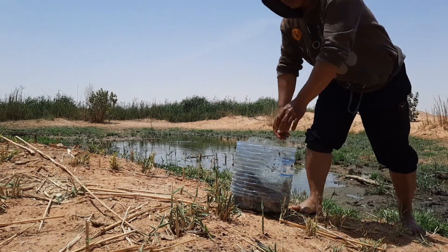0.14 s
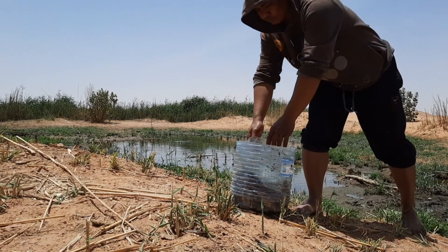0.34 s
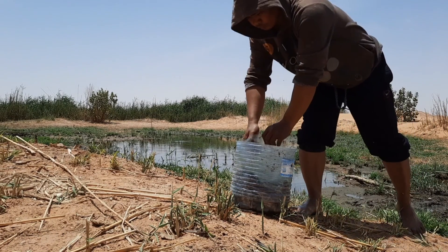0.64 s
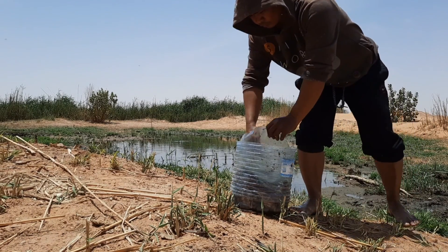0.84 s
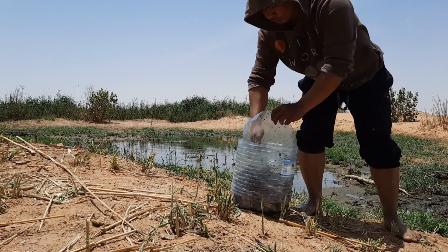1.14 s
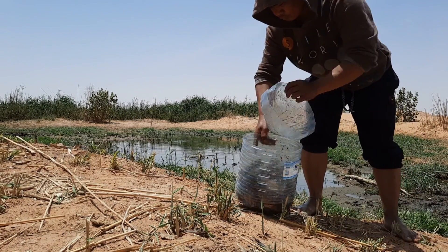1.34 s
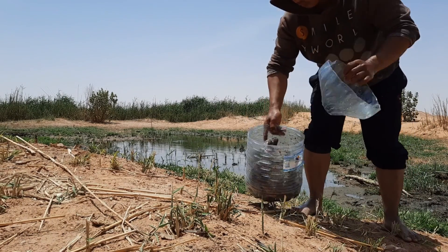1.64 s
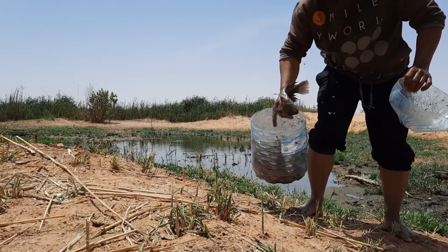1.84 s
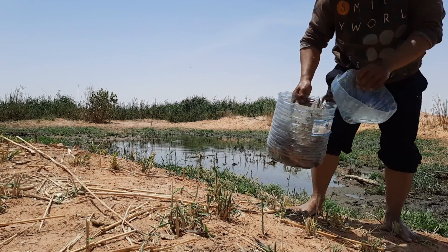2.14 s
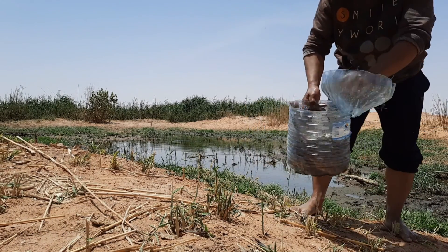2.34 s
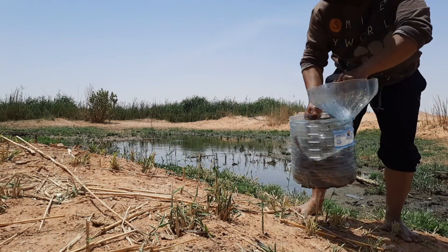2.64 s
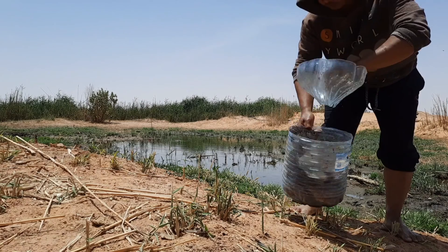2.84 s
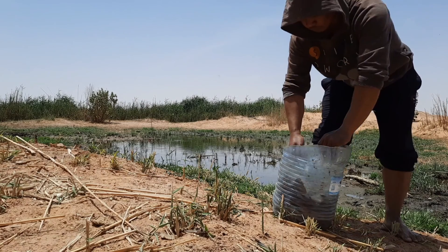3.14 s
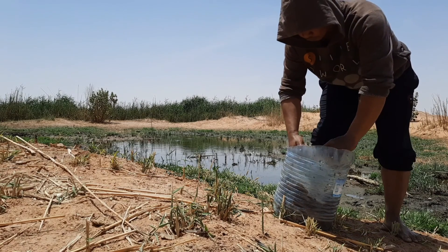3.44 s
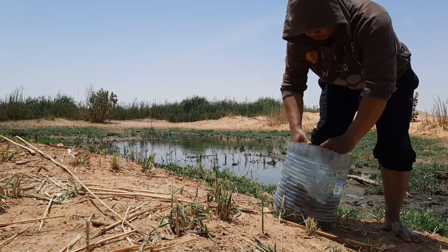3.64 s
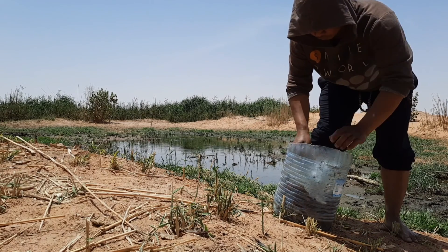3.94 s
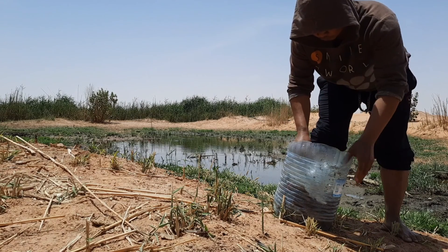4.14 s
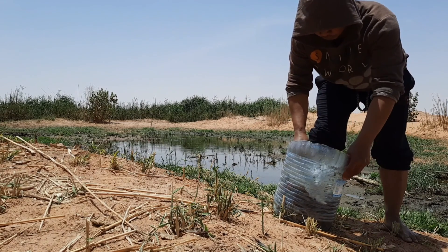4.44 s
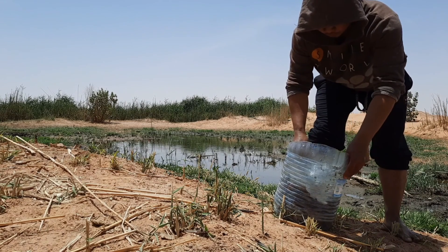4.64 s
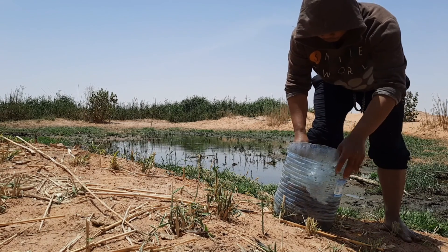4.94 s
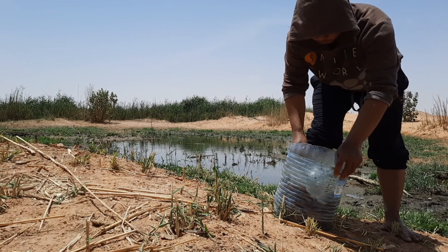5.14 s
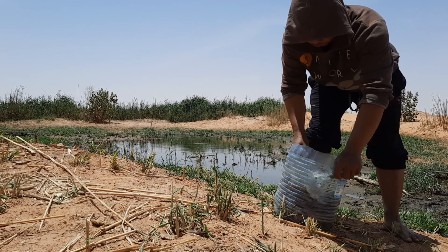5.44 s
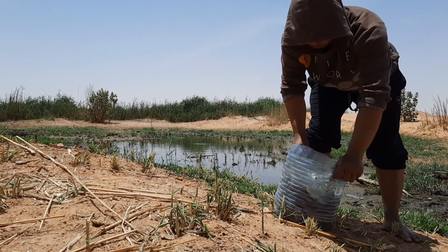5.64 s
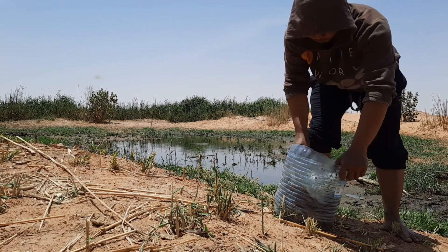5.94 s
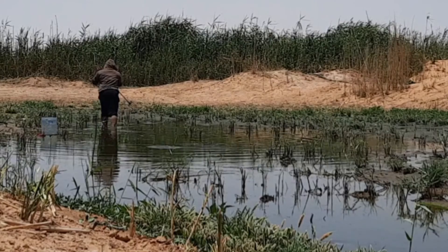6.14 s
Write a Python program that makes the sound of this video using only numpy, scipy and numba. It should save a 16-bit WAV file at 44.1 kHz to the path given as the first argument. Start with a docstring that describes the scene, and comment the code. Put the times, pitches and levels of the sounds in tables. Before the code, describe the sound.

A big thin plastic bottle crackles and creaks as its cut top is pulled out, turned over and pressed back in, with hollow knocks.

```python
"""Outdoors, a hand pulls the cut-off top out of a big thin plastic bottle, turns it over and presses it back in.
Stick-slip friction sounds in dense grains, coloured by how the top is held; creases snap through in ticks and
clacks, and struck body modes give a hollow ring. Thin squeaks and low thuds are gliding or dying sine tones.
Two close microphone ports hear the bottle from the right, over filtered noise: the low rumble of open air."""
import sys
import numpy as np
from scipy import signal
from scipy.fft import rfft, irfft
from scipy.io import wavfile
from scipy.ndimage import uniform_filter1d
from numba import njit

SR = 44100
rng = np.random.default_rng(int(sys.argv[2]) if len(sys.argv) > 2 else 0)


def master_out(mix):
    """Clip the mix to full scale and print it as 16-bit PCM to the path in sys.argv[1]."""
    frames = np.transpose(np.atleast_2d(mix))
    ceiling = np.clip(frames, -1, 1)
    pcm = np.round(ceiling * 32767).astype(np.int16)
    wavfile.write(sys.argv[1], SR, pcm)


N = 276948
T = np.arange(N) / SR  # time [s]

# Spectrum of open air: (frequency [Hz], level [dB])
AIR_COLOUR = [(30, -27.5), (66, -4), (125, -12.5), (220, -23), (330, -24), (900, -45.5), (3000, -59),
              (15000, -53)]
# Low rumble of open air: (time [s], level [dB])
RUMBLE_LEVEL = [(0, -52), (.55, -51), (1.05, -42), (1.42, -50.5), (1.9, -38), (3.3, -49.5), (4.6, -51),
                (5.6, -48), (5.87, -53), (6.28, -45.5)]
# Faint thin squeaks: (start [s], length [s], first pitch [Hz], last pitch [Hz], level [dB])
SQUEAK_GLIDES = [(1.302, 0.41, 2270, 2000, -62.5), (4.594, 0.038, 4620, 3950, -49),
                 (4.61, 0.11, 3700, 3070, -51.5), (5.558, 0.056, 1520, 1420, -60)]
# The whole bottle jolted or set down on the sand: (time [s], level [dB], pitch [Hz])
BODY_THUDS = [(1.8, -26.5, 166), (2.437, -21, 149), (3.103, -17.5, 118.5)]
# Knocks on the body: (time [s], level [dB], ring pitch [Hz])
BODY_KNOCKS = [(0.887, -27, 310), (1.003, -24, 298), (1.247, -22, 730), (1.664, -10, 322),
               (1.753, -10.5, 321), (1.771, -9, 305), (1.8, -15, 322.6), (1.812, -15.5, 305.5),
               (1.886, -24, 313), (2.03, -21, 347), (2.115, -16, 289), (2.24, -11.5, 359),
               (2.438, -12.5, 425), (2.496, -18, 291), (2.82, -25, 357), (3.101, -10.5, 335),
               (3.11, -9.5, 313), (3.159, -23, 596), (3.168, -16.5, 352), (3.213, -15, 309),
               (3.286, -19.5, 393), (3.3975, -28, 300), (3.963, -23.5, 304), (3.983, -22.5, 396),
               (4.261, -32.5, 345), (4.666, -44, 708), (4.78, -42, 350), (4.809, -34.5, 390),
               (4.964, -32, 313), (5.082, -31.5, 344), (5.108, -33.5, 386), (5.24, -30.5, 443),
               (5.273, -29.5, 327), (5.298, -26, 410), (5.323, -14.5, 365), (5.352, -23, 322),
               (5.475, -21.5, 308), (5.745, -21.5, 295), (6.025, -37, 370), (6.065, -29, 291)]
# Modes of the body at slack grip: (multiple of the ring pitch, level [dB], time to decay by 60 dB [s])
BODY_MODES = [(1.002, 5.5, 0.077), (1.3, -1, 0.011), (1.85, -11.5, 0.034), (2.6, -22, 0.054)]
# Creases snapping through: (time [s], wall clack level [dB], sharp tick level [dB])
CREASE_SNAPS = [(0.746, -23, -48), (0.963, -23.5, -57), (1.633, -27.5, -38.5), (1.665, -26, -46),
                (1.681, -25.5, -32.5), (1.748, -18, -31), (1.771, -14.5, -28.5), (1.777, -28.5, -24.5),
                (1.8007, -9.5, -11.5), (1.913, -27.5, -44), (1.967, -31, -42.5), (1.9855, -14.5, -29.5),
                (2.043, -27, -37), (2.149, -30.5, -28.5), (2.224, -31, -19), (2.397, -20, -20.5),
                (2.4004, -12, -32), (2.437, -17, -22), (2.457, -23, -24.5), (2.498, -32, -24),
                (2.535, -19, -19), (2.591, -23.5, -23), (2.767, -30.5, -28.5), (2.819, -32.5, -31.5),
                (2.914, -32, -51), (3.1004, -18.5, -29.5), (3.167, -27.5, -33), (3.285, -42, -47.5),
                (3.34, -48, -36.5), (3.488, -50, -42), (3.637, -44, -38.5), (3.9658, -31, -46),
                (4.232, -59.5, -45.5), (4.72, -45.5, -51), (4.94, -45.5, -49.5), (5.221, -51, -57),
                (6.064, -52.5, -51.5)]
# Colour of the top rubbing inside the bottle: (frequency [Hz], level [dB])
NESTED_COLOUR = [(100, -4.5), (123, -18.5), (181, -13.5), (218, -14.5), (300, -0.5), (541, -15.5),
                 (850, -21), (1310, -31), (2270, -23.5), (3850, -33), (7100, -37.5), (8580, -39),
                 (11800, -34.5), (15500, -40)]
# Colour of the top held free like a horn: (frequency [Hz], level [dB])
FREE_COLOUR = [(100, -3.5), (228, -2), (319, 10), (457, 2.5), (774, -14), (1290, -7.5), (1490, -7.5),
               (1760, -7), (4100, -25), (8580, -32), (11300, -30.5), (15500, -29)]
# Strokes that slide plastic on plastic: working the top loose, pulling it out and turning it over (from 1.6 s),
# pressing it in and seating it (from 3.1 s), two firm pushes and the easing grip (from 5.3 s):
# (start [s], rise [s], hold [s], hollow body level [dB], wall crackle level [dB], edge hiss level [dB])
HAND_STROKES = [ (0.408, 0.02, 0.018, -55.5, -64.5, -71), (0.614, 0.13, 0.014, -30.5, -37, -45),
                (0.778, 0.02, 0.027, -35, -41.5, -44.5), (0.849, 0.038, 0.023, -36, -38, -46),
                (0.876, 0.078, 0.081, -27, -36, -39), (1.029, 0.019, 0.058, -38, -48, -46.5),
                (1.075, 0.15, 0.04, -30.5, -33.5, -41), (1.296, 0.019, 0.068, -42, -54, -64.5),
                (1.396, 0.057, 0.095, -56, -63.5, -58.5), (1.597, 0.082, 0.0081, -30, -32.5, -39.5),
                (1.702, 0.063, 0.012, -22, -29, -28), (1.8, .03, 0.092, -42, -45, -42.5),
                (1.895, 0.087, 0.081, -27.5, -32.5, -35.5), (2.067, 0.04, 0.2, -30, -36, -36),
                (2.201, 0.028, 0.091, -24, -24.5, -29), (2.35, 0.057, 0.15, -21.5, -22, -28.5),
                (2.537, 0.044, 0.12, -28, -31.5, -36.5), (2.71, 0.027, 0.11, -33, -38, -40),
                (2.841, 0.045, 0.044, -34, -39.5, -45), (2.983, 0.0069, 0.16, -40, -43, -45.5),
                (3.092, 0.0025, 0.1, -25.5, -32.5, -36), (3.183, 0.029, 0.14, -32, -45.5, -51),
                (3.396, 0.0033, 0.008, -38.5, -51, -61), (3.471, 0.01, 0.11, -40, -49.5, -52.5),
                (3.518, 0.06, 0.15, -33.5, -39, -47), (3.721, 0.038, 0.028, -35, -40.5, -46.5),
                (3.843, 0.015, 0.075, -36, -44, -50.5), (3.956, 0.0075, 0.047, -34.5, -45.5, -51),
                (4.061, 0.089, 0.021, -45.5, -51.5, -59.5), (4.201, 0.042, 0.061, -41, -53.5, -59.5),
                (4.399, 0.019, 0.014, -51, -61, -69.5), (4.556, 0.13, 0.051, -45, -58, -60.5),
                (4.681, 0.083, 0.2, -46.5, -55, -59), (4.993, 0.092, 0.024, -41.5, -52, -55),
                (5.199, 0.015, 0.084, -44, -57, -54.5), (5.316, 0.0098, .1, -25, -34, -40.5),
                (5.428, 0.015, 0.057, -31.5, -45, -46), (5.61, 0.005, 0.03, -40.5, -46.5, -54),
                (5.609, 0.072, 0.051, -26.5, -36.5, -44), (6.023, 0.038, 0.049, -45, -59, -61.5),
                (6.118, 0.025, 0.028, -57.5, -64, -59.5)]
# Faint rubbing of the resting hands: (hollow body level [dB], wall crackle level [dB], edge hiss level [dB])
RESTING_GRIP = (-73.5, -78, -76.5)

HISS_DB = -73  # steady wide hiss of the air
SHAKE_BAND, WALL_BAND, EDGE_BAND = (130, 1050), (900, 3500), (3500, 16000)  # Hz
FREE_FROM_S, FREE_TO_S = 2.18, 3.07  # the top is out of the bottle
RISE_POWER, SAG_DB_PER_S, RELEASE_DB_PER_S = 1.6, 34.5, 398.5  # shape shared by all strokes
LINGER_DB, LINGER_S = -21, 0.031  # faint creak of the relaxing wall after release
THINNING = .35  # exponent of slip rate against gain of touch
SLACK_HZ, GRIP_DAMPING = 308, 4  # slack pitch; exponent of damping against pitch above it
BEND, SETTLE_S, SWELL_S = 0.1, 0.0039, 0.0035  # initial sharpness of a dented wall (share), its settling, onset
CONTACT_DB, CONTACT_BAND = -12.5, (520, 1400)  # dull click, relative to the knock level; Hz
PORT_LAG = 5  # samples
TOP_HZ = 15800  # upper limit of the recorder


def undb(db):
    """Logarithmic level: decibels become an amplitude gain."""
    return 10 ** (np.asarray(db) / 20)


def gain_at(points, hz):
    """Spectral envelope: decibels interpolated along log frequency, returned as gain."""
    point_hz, db = np.transpose(points)
    return undb(np.interp(np.log(hz + 1), np.log(point_hz), db))


def colour(x, points, band, order=6, size=2048):
    """Minimum-phase filtering: a folded cepstrum gives a causal response of the given colour and band."""
    hz = np.arange(size // 2 + 1) * SR / size + 1
    low_cut = 1 + (band[0] / hz) ** (2 * order)
    high_cut = 1 + (hz / band[1]) ** (2 * order)
    gain = gain_at(points, hz) / np.sqrt(low_cut * high_cut)
    cepstrum = irfft(np.log(gain + 1e-5))
    cepstrum[1:size // 2] *= 2
    cepstrum[size // 2 + 1:] = 0
    response = irfft(np.exp(rfft(cepstrum)))
    return signal.oaconvolve(x, response[None], axes=1)[:, :x.shape[1]]


def steady(x, seconds):
    """Power normalisation: local power, smoothed twice over a sliding window, is divided out."""
    size = max(int(seconds * SR), 2)
    power = uniform_filter1d(uniform_filter1d(np.mean(x ** 2, 0), size), size)
    return x / np.sqrt(np.abs(power) + 1e-9 * power.mean())


def add(out, s, sound):
    """Superposition: a sound is added to both ports from a given time."""
    i = max(int(s * SR), 0)
    out[:, i:i + sound.shape[1]] += sound[:, :N - i]


def walk(per_s):
    """Random modulation: normal levels of unit spread joined by straight lines."""
    return np.interp(T * per_s, np.arange(1024), rng.standard_normal(1024))


@njit
def resonate(x, hz, share):
    """Resonance: a state-variable band-pass of moving centre, width a share of it, gain 1 there."""
    y, band, low = np.empty(x.shape), np.zeros(len(x)), np.zeros(len(x))
    for i in range(x.shape[1]):
        g = np.pi * hz[i] / SR
        scale = 1 / (1 + g * (g + share))
        for c in range(len(x)):
            v = (band[c] + g * (x[c, i] - low[c])) * scale
            band[c] = 2 * v - band[c]
            low[c] += 2 * g * v
            y[c, i] = share * v
    return y


def open_air(side_low=0.32, side_high=0.97):
    """Partial coherence: a varying rumble, largely common to both ports, lies under a faint wide hiss."""
    hz = np.arange(N // 2 + 1) * SR / N
    mid, side = rfft(rng.standard_normal((2, N))) * gain_at(AIR_COLOUR, hz)
    side = side * np.interp(hz, [300, 2000], [side_low, side_high])
    ports = np.array([mid + side, mid - side])
    low_share = np.interp(hz, [400, 900], [1, 0])
    rumble = irfft(ports * low_share, N)
    hiss = irfft(ports * (1 - low_share), N)
    rumble_gain = undb(np.interp(T, *np.transpose(RUMBLE_LEVEL)))
    return rumble / rumble.std() * rumble_gain + hiss / hiss.std() * undb(HISS_DB)


def squeaks(waver=.045):
    """Frequency modulation: a brief wavering tone swells, sinks in pitch and fades."""
    out = np.zeros((2, N))
    for s, length_s, first_hz, last_hz, db in SQUEAK_GLIDES:
        n = int(length_s * SR)
        hz = np.geomspace(first_hz, last_hz, n) * (1 + waver * walk(378)[:n])
        tone = np.hanning(n) * np.sin(2 * np.pi * np.cumsum(hz) / SR)
        add(out, s, undb(db) * tone[None])
    return out


def thuds():
    """Impulse response of a heavy damped oscillator: each jolt is a low, quickly dying sine."""
    out, t = np.zeros((2, N)), T[:SR // 5]
    for s, db, hz in BODY_THUDS:
        thud = np.sin(2 * np.pi * hz * t) * np.exp(-t / 0.013) * (1 - np.exp(-t / 0.00052))
        add(out, s, undb(db) * thud[None])
    return out


def flutter(ring_s, tail_s, tail_db, apart):
    """Dispersal of bending waves in a thin wall: decaying noise, of which each port hears a share of its own."""
    t = T[:SR // 12]
    noise = rng.standard_normal((3, len(t)))
    apart = np.clip(apart, 0, 1)
    ports = np.sqrt(1 - apart) * noise[0] + np.sqrt(apart) * noise[1:]
    return ports * (np.exp(-t / ring_s) + undb(tail_db) * np.exp(-t / tail_s))


def snap(points, band, ring_s, tail_s, tail_db, apart):
    """Transient excitation: wall flutter of randomly varied colour, rms 1 over its first 3 ms."""
    stretch = np.exp(.1 * rng.standard_normal())
    own = [(hz * stretch, db + 3 * rng.standard_normal()) for hz, db in points]
    x = colour(flutter(ring_s, tail_s, tail_db, apart), own, band, order=3)
    return x / np.sqrt(np.mean(x[:, :SR // 333] ** 2))


def knocks():
    """Modal vibration: a dull click starts a ring, sharp at first; grip sets pitch and damping, spot the upper modes."""
    out, t = np.zeros((2, N)), T[:SR // 5]
    ratio, mode_db, t60 = np.array(BODY_MODES).T[..., None]
    upper = np.arange(len(BODY_MODES))[:, None] > 0  # the lowest mode does not vary with the spot hit
    bent_time = t + BEND * SETTLE_S * (1 - np.exp(-t / SETTLE_S))
    swell = 1 - np.exp(-t / SWELL_S)
    for s, db, hz in BODY_KNOCKS:
        detune, luck = rng.standard_normal((2, len(BODY_MODES), 1)) * upper
        damping = np.clip((hz / SLACK_HZ) ** GRIP_DAMPING, 1, 2)
        fade = undb(mode_db + 2.2 * luck) * np.exp(-np.log(1000) * t * damping / t60)
        mode_hz = hz * ratio * (1 + 0.026 * detune)
        ring = np.sum(fade * np.sin(2 * np.pi * mode_hz * bent_time), axis=0)
        click = snap(NESTED_COLOUR, CONTACT_BAND, ring_s=.0025, tail_s=0.0098, tail_db=-18.5, apart=0)
        add(out, s, undb(db) * (ring * swell)[None])
        add(out, s, undb(db + CONTACT_DB) * click)
    return out


def cracks():
    """Snap-through buckling: a flipping crease gives a sharp tick and a short clack of the wall around it."""
    out = np.zeros((2, N))
    for s, wall_db, tick_db in CREASE_SNAPS:
        points = FREE_COLOUR if FREE_FROM_S < s < FREE_TO_S else NESTED_COLOUR
        clack = snap(points, (1300, 3300), ring_s=0.0027, tail_s=0.015, tail_db=-13.5, apart=0.71)
        tick = snap(points, (5200, 17000), ring_s=0.0041, tail_s=0.014, tail_db=-14, apart=0.94)
        add(out, s, undb(wall_db) * clack + undb(tick_db) * tick)
    return out


def effort(start, rise_s, hold_s):
    """Loading and relaxation: pressure builds, sags while the hand tires, then falls as the wall relaxes."""
    t = T - start - rise_s
    pressure = np.clip(1 + t / max(rise_s, 1 / SR), 0, 1) ** RISE_POWER
    sag = undb(-SAG_DB_PER_S * np.clip(t, 0, max(hold_s, 0)))
    after = np.maximum(t - hold_s, 0)
    linger = undb(LINGER_DB) * np.exp(-after / LINGER_S)
    return pressure * sag * np.maximum(undb(-RELEASE_DB_PER_S * after), linger)


def stroke_gains():
    """Incoherent addition: all strokes add in power to the resting grip, for body, wall and edge."""
    power = np.outer(undb(RESTING_GRIP) ** 2, np.ones(N))
    for start, rise_s, hold_s, *layers_db in HAND_STROKES:
        power += np.outer(undb(layers_db), effort(start, rise_s, hold_s)) ** 2
    return np.sqrt(power)


@njit
def scatter(starts, sizes, spots, rings):
    """Linear superposition of grains, each the ring of its own spot."""
    out = np.zeros((2, N))
    for k in range(len(starts)):
        start, size = starts[k], sizes[k]
        for port in range(2):
            ring = rings[spots[k], port]
            for i in range(min(len(ring), N - start)):
                out[port, start + i] += size * ring[i]
    return out


def slips(touch, per_s, spread_db, ring_s, tail_s, tail_db, apart, count=16):
    """Stick-slip friction: uneven random pulses ring many spots on the wall; a lighter touch makes fewer."""
    rings = np.array([flutter(ring_s, tail_s, tail_db, apart)[:, :SR // 25] for _ in range(count)])
    chance, luck, spots = rng.random(N), rng.standard_normal(N), rng.integers(count, size=N)
    rate = per_s * np.maximum((touch / touch.max()) ** THINNING, .2)
    starts = np.flatnonzero(chance < rate / SR)
    sizes = undb(spread_db * np.clip(luck[starts], -2, 2))
    return scatter(starts, sizes, spots[starts], rings)


def panels(x, low_hz=820, high_hz=2750, boost_db=3.0, patchy_db=6, per_s=20, count=6):
    """Plate resonance: flexing moves the pitches of wall panels, and fingers damp now one, now another."""
    out = x
    for hz in np.geomspace(low_hz, high_hz, count):
        ring = resonate(x, hz * np.exp(.11 * walk(per_s)), .06)
        out = out + undb(boost_db + patchy_db * walk(2 * per_s)) * ring
    return out


def lurches(depth, fall_s=0.021, per_s=45):
    """Jerky sliding: random kicks start at once and die away exponentially, in every band alike."""
    kicks = 1. * (rng.random(N) < per_s / SR)
    jerks = 1 + depth * signal.lfilter([1], [1, -np.exp(-1 / (fall_s * SR))], kicks)
    return steady(jerks[None], 0.028)


def stalls(build_s=0.0068, dip_db=-6):
    """Static friction: the plastic catches, so sliding dips while load builds before each crease snaps."""
    db = np.zeros(N)
    n = int(build_s * SR)
    dip = dip_db * np.sqrt(np.linspace(0, 1, n))
    for s, *_ in CREASE_SNAPS:
        i = int(s * SR)
        db[i - n:i] = np.minimum(db[i - n:i], dip)
    return undb(db)


def rubbing():
    """Friction-driven vibration: slow slips shake the body, quicker ones crackle the wall, the finest hiss at the edge."""
    body_gain, wall_gain, edge_gain = stroke_gains()
    free = uniform_filter1d(1. * ((T > FREE_FROM_S) & (T < FREE_TO_S)), SR // 20)

    def voiced(x, band):
        """Radiation by a changing cavity: the colour crossfades between nested and free top."""
        return (1 - free) * colour(x, NESTED_COLOUR, band) + free * colour(x, FREE_COLOUR, band)

    shake = slips(body_gain, per_s=750, spread_db=3.0, ring_s=0.0033, tail_s=0.0031, tail_db=-19.0, apart=0)
    crackle = slips(wall_gain, per_s=900, spread_db=5, ring_s=0.002, tail_s=0.009, tail_db=-2, apart=0.45)
    grit = slips(edge_gain, per_s=1600, spread_db=6.5, ring_s=0.00046, tail_s=0.018, tail_db=-5.5, apart=0.84)
    body = steady(voiced(shake, SHAKE_BAND), 0.022) * body_gain
    wall = steady(voiced(panels(crackle), WALL_BAND), 0.018) * wall_gain
    edge = steady(voiced(grit, EDGE_BAND), 0.32) * edge_gain
    return (body + wall + edge) * lurches(depth=1.0) * stalls()


def scene(cavity_hz=700.0, cavity_db=-6):
    """Interaural-style delay: with the bottle at the right, the left port lags and adds a mild cavity resonance."""
    left, right = squeaks() + thuds() + knocks() + cracks() + rubbing()
    left = left + undb(cavity_db) * resonate(left[None], np.full(N, cavity_hz), .4)[0]
    delayed_left = np.pad(left, (PORT_LAG, 0))[:N]
    return open_air() + np.array([delayed_left, right])


def record(dry):
    """Band limitation: the recorder thins the deepest bass, clips at full scale and cuts the top."""
    bass_cut = signal.butter(3, 48, "high", fs=SR, output="sos")
    top_cut = signal.ellip(10, .2, 90, TOP_HZ, fs=SR, output="sos")
    thinned = signal.sosfilt(bass_cut, dry)
    return signal.sosfilt(top_cut, np.clip(thinned, -1, 1))


dry = scene()
out = record(dry)
master_out(out)
```